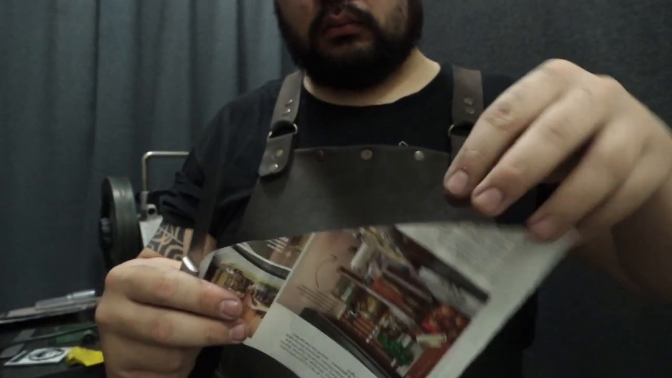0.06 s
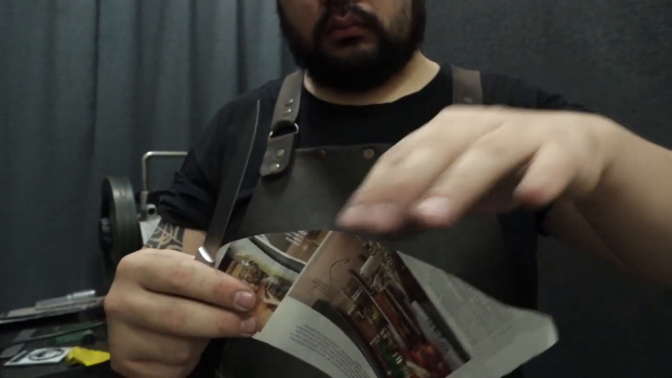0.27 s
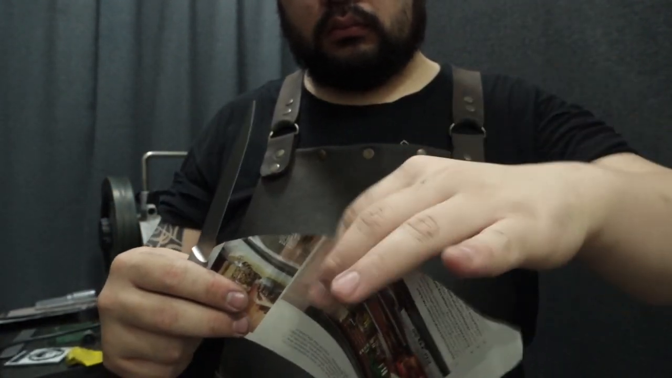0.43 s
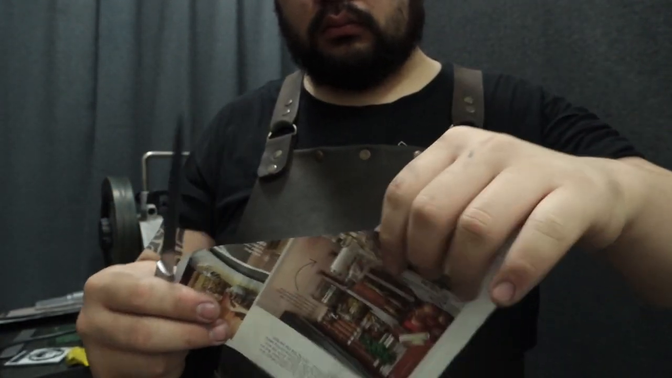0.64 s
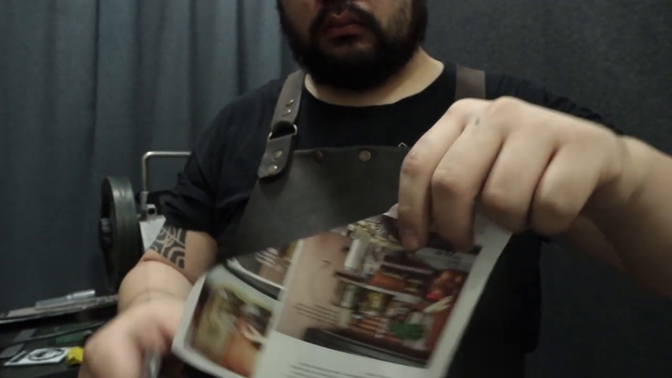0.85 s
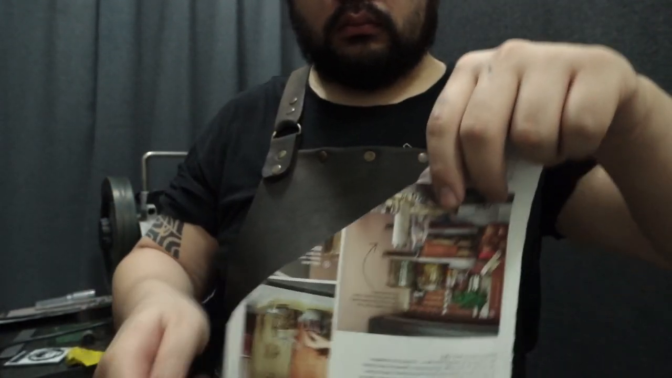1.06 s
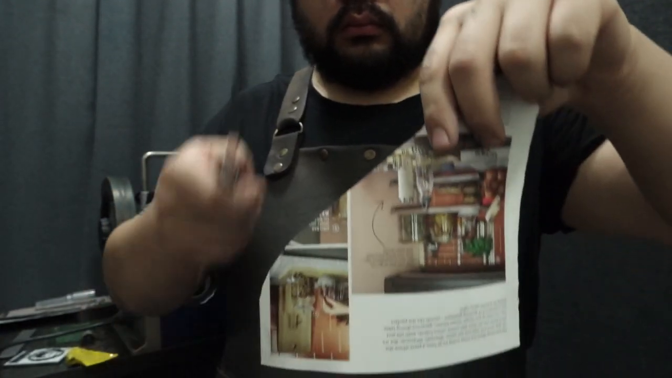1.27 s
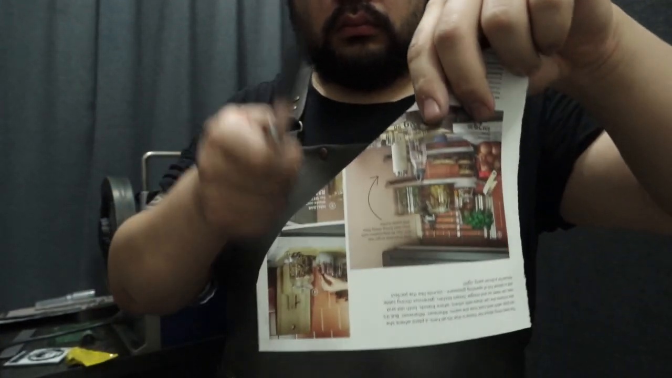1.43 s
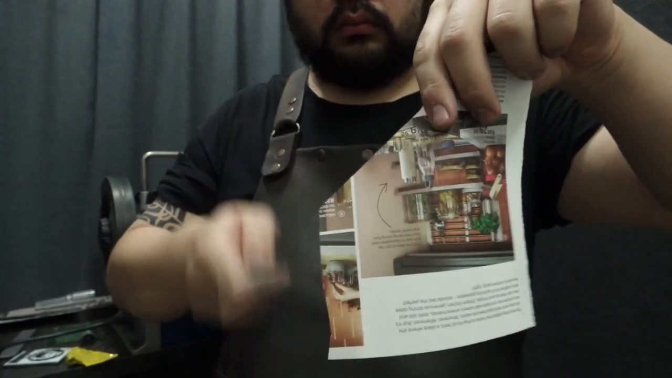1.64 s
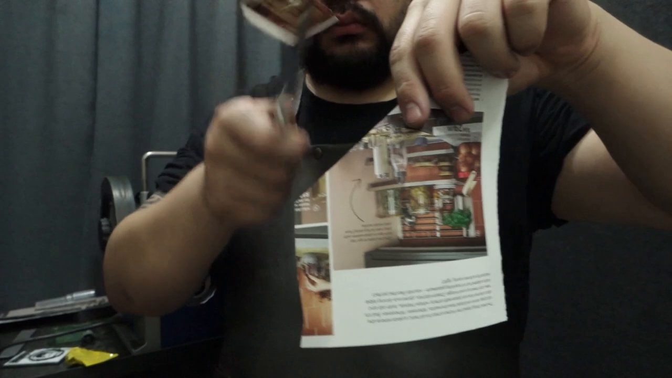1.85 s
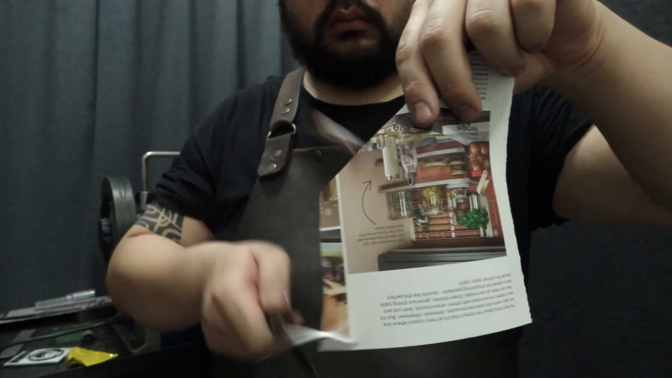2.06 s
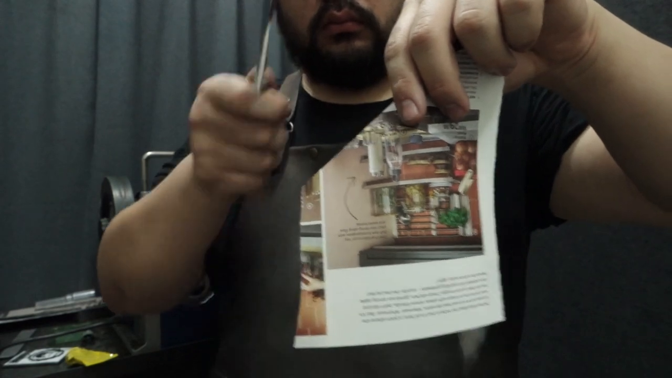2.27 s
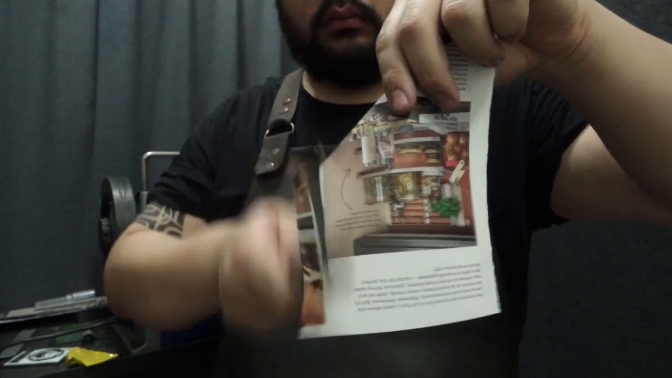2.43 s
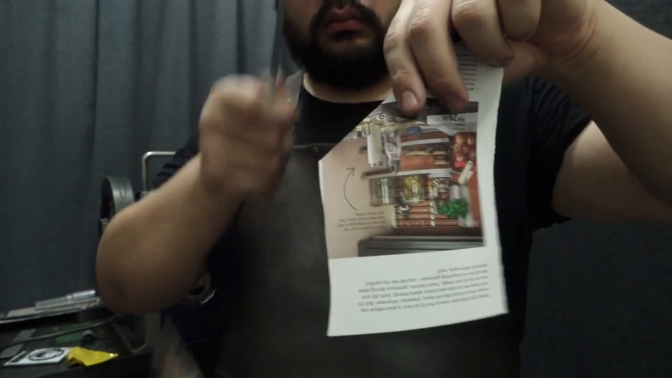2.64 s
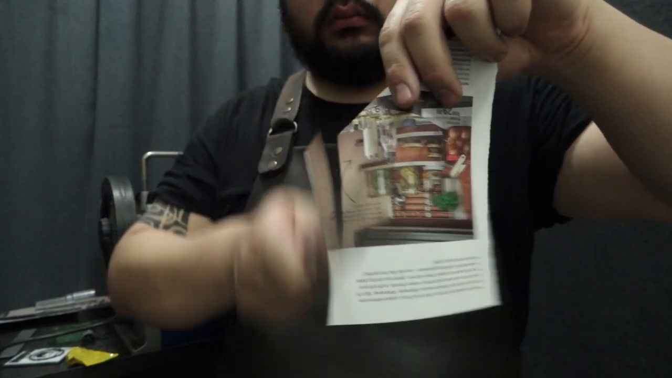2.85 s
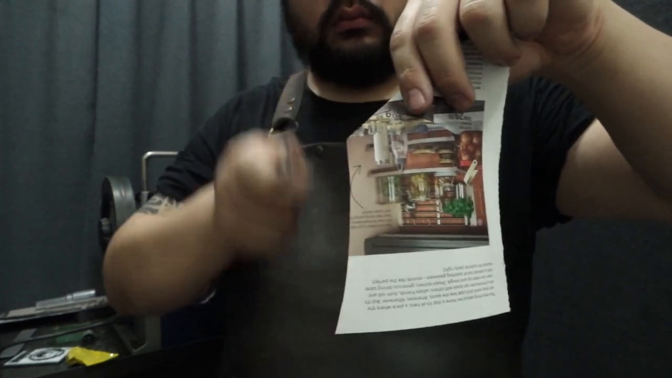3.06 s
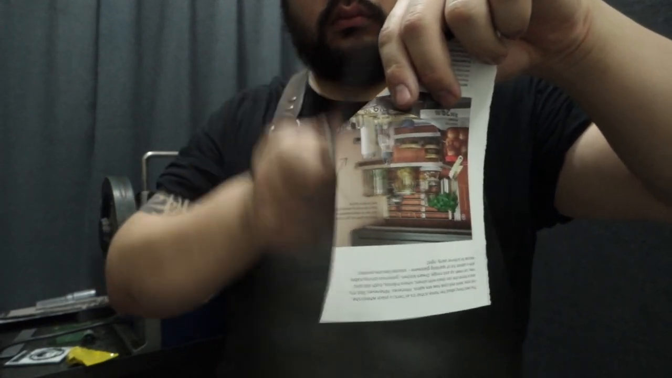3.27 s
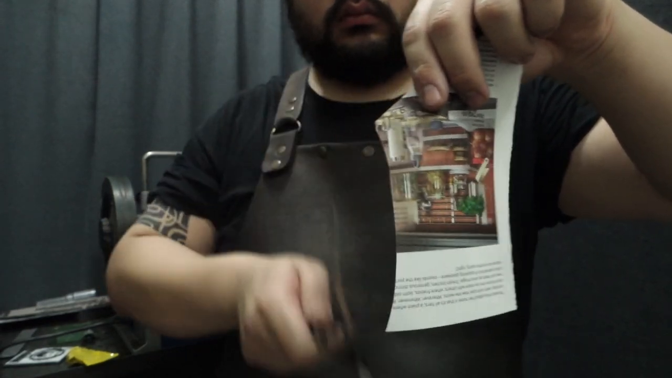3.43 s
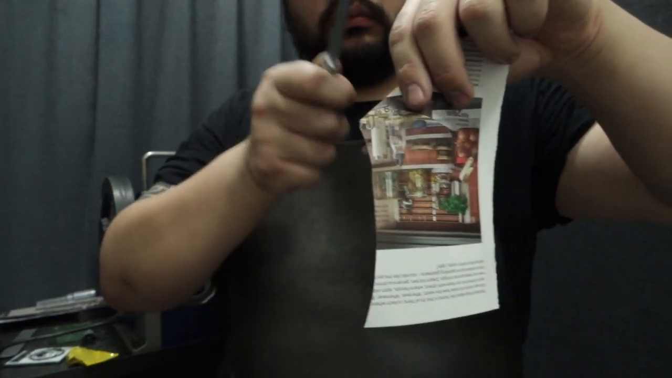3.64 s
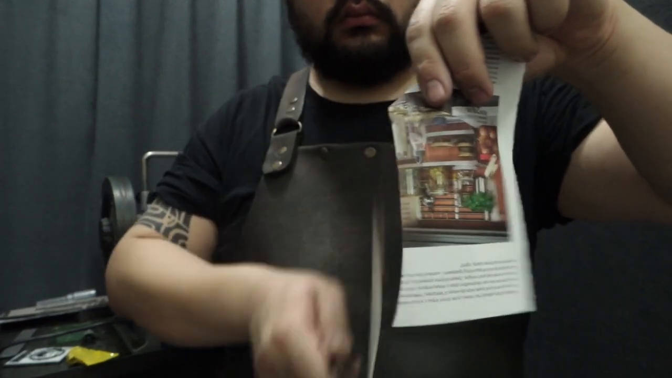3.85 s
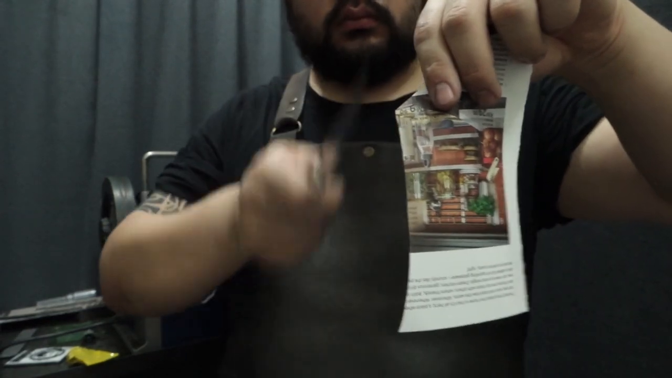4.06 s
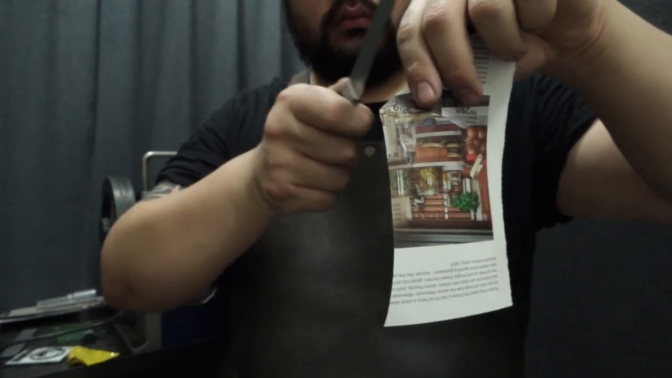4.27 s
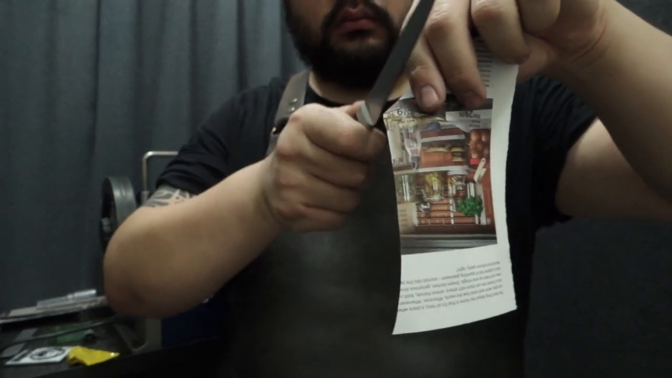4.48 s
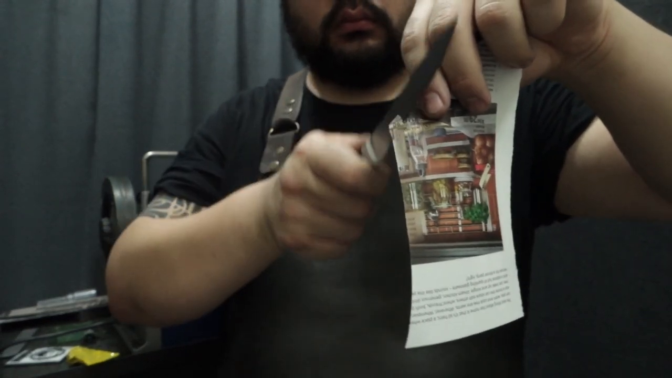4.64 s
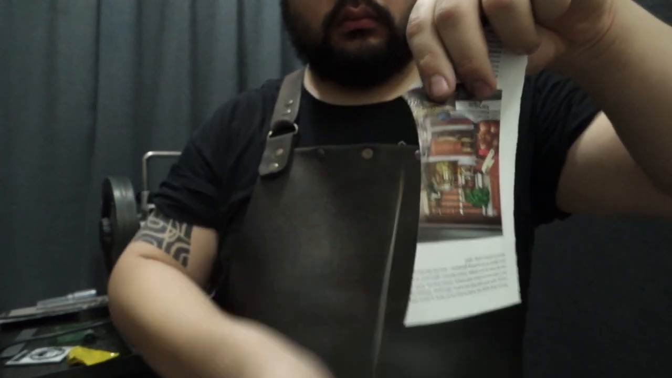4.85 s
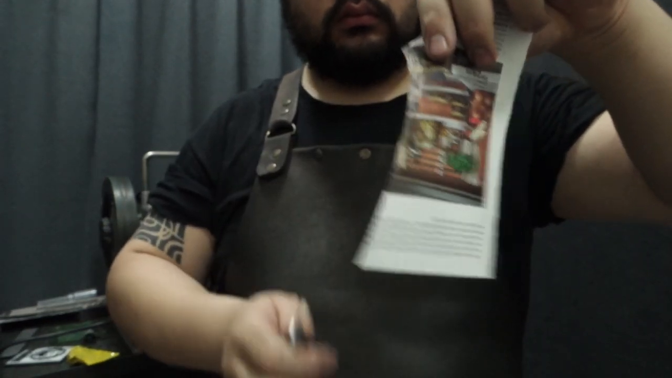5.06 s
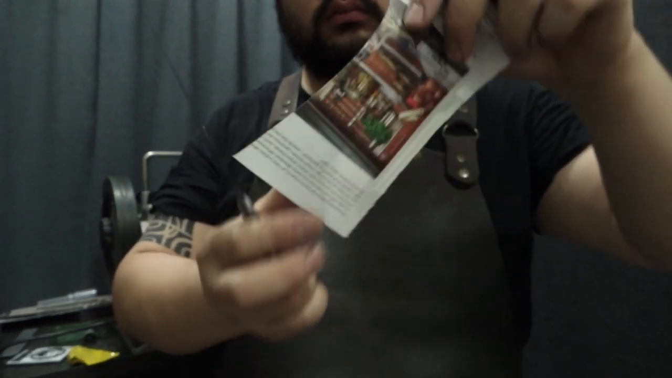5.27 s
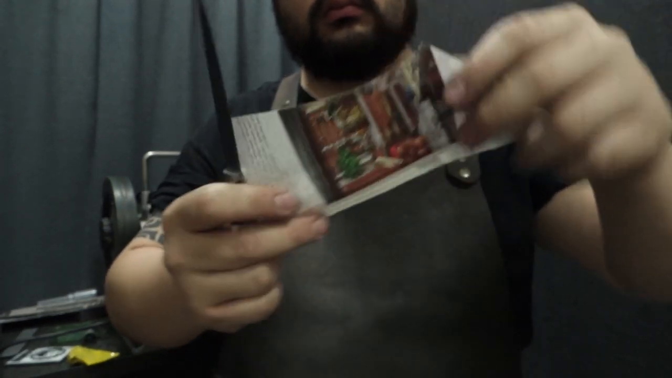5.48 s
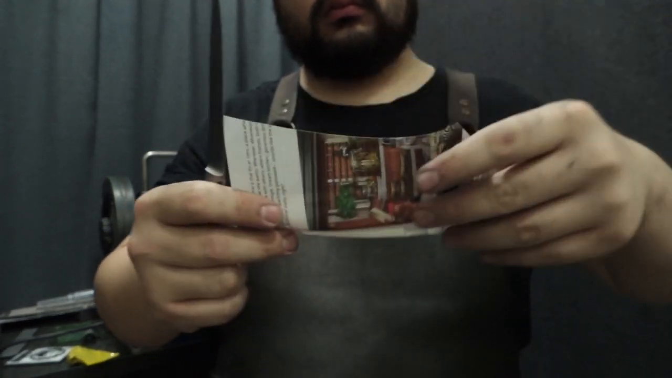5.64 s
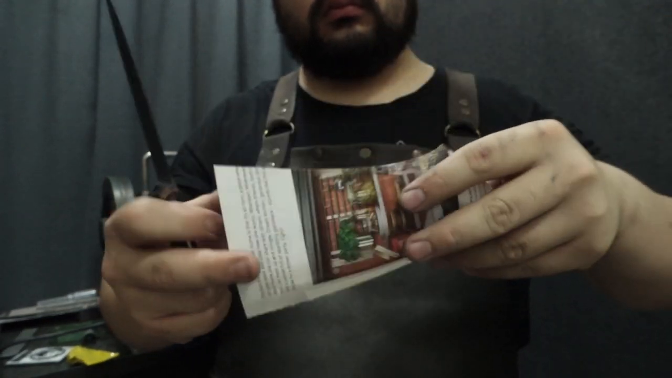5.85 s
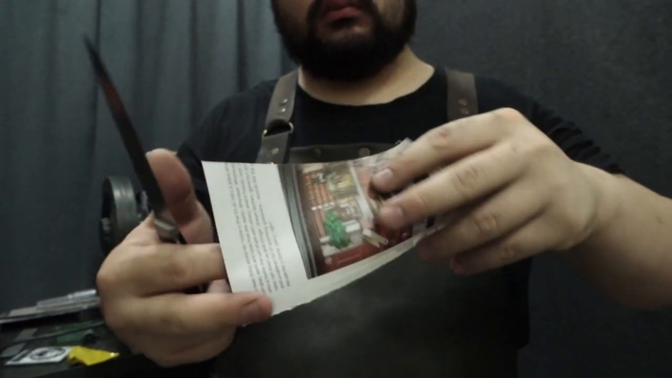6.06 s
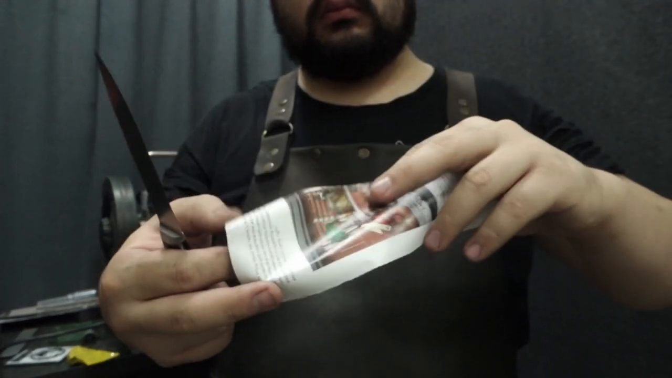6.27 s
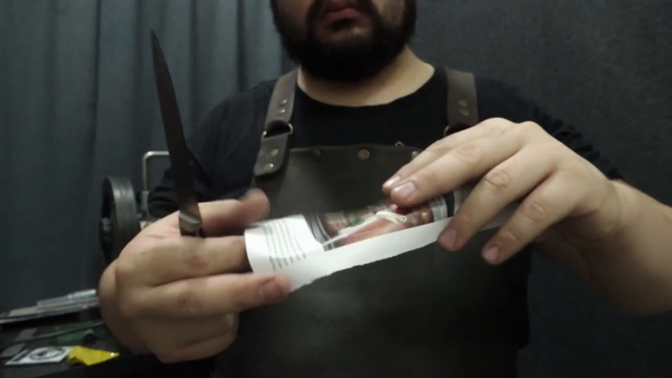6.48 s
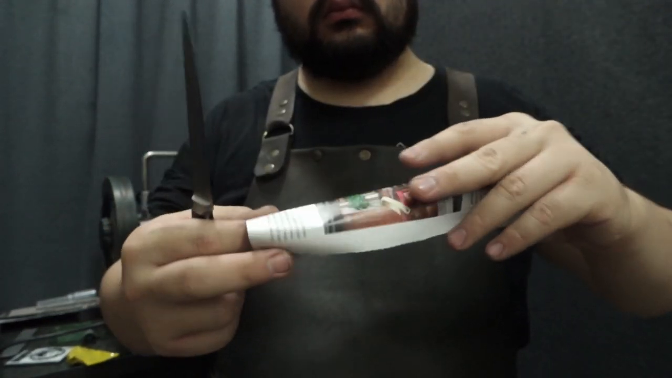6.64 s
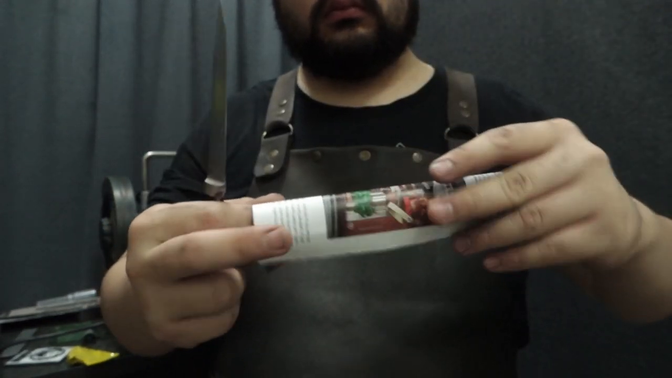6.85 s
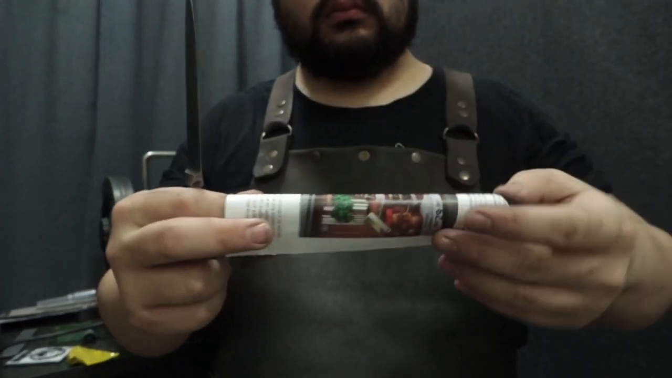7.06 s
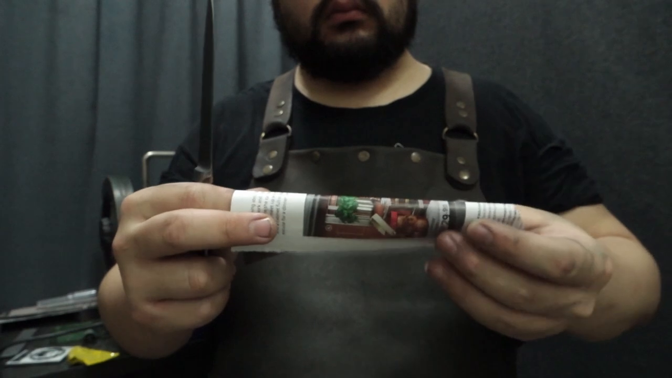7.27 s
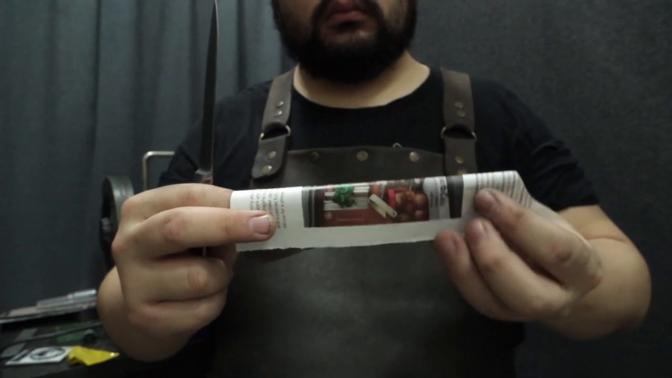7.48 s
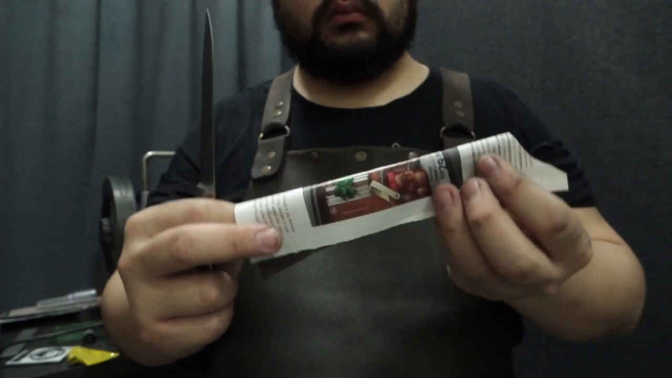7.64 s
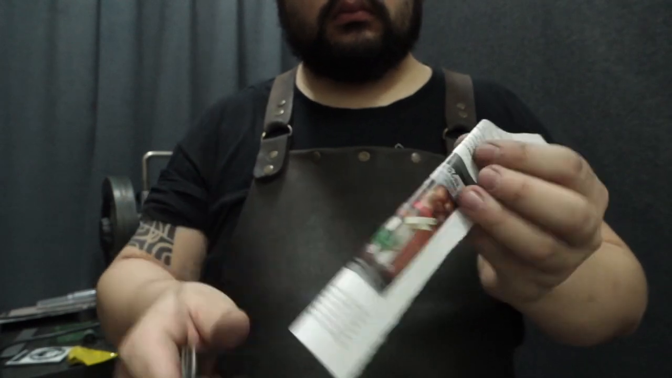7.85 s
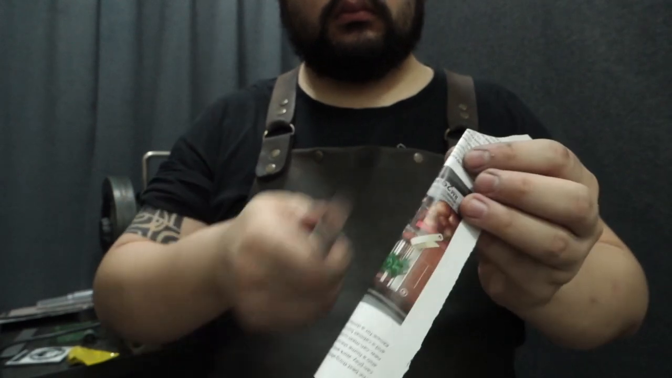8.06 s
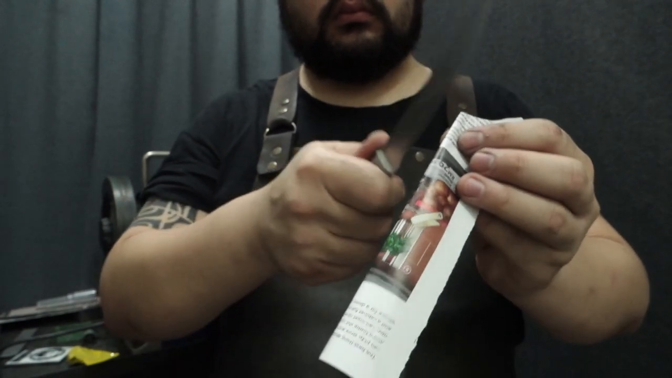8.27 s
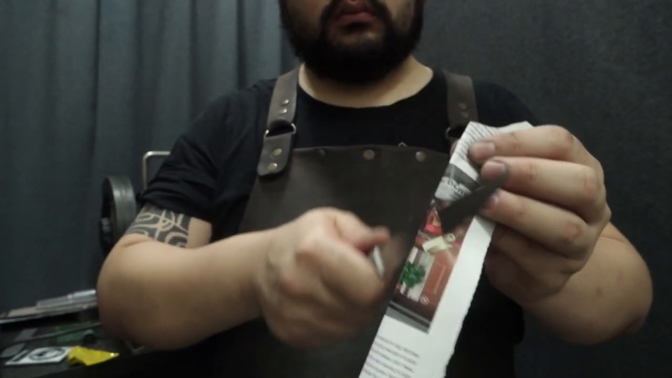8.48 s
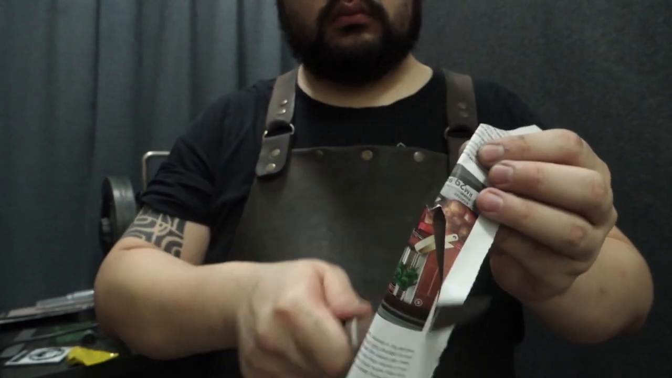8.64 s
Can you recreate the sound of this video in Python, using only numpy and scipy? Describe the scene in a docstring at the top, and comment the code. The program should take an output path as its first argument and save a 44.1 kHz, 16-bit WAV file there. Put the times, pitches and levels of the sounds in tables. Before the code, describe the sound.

A magazine page rustles in the hand, then a sharp knife takes off strips in six quick, evenly spaced swishes and one longer, rasping cut. The remaining paper rubs, crinkles and pops as it is folded and creased, and the folded strip is sliced slowly. The sounds are close, in a small workshop with a brief echo and a faint fan behind.

```python
"""A small workshop: a sharp knife slices strips off a hanging magazine page, six quick swishes and a
longer cut. The page is gripped, folded and creased, then the folded strip is sliced slowly. Fibres
snap under the edge, hissing at the cut and shaking the sheet; handled paper rubs, crinkles and pops.
The room answers briefly. Behind a close pair of microphones a fan whirs and a thin whine comes and goes."""
import sys
import numpy as np
from scipy import signal
from scipy.fft import rfft, irfft, next_fast_len
from scipy.io import wavfile

SR = 44100
rng = np.random.default_rng(int(sys.argv[2]) if len(sys.argv) > 2 else 0)


def unload_wav(signal):
    """Save mono or channel-first audio to the path in sys.argv[1] as 16-bit WAV at rate SR, clipped to [-1, 1]."""
    wavfile.write(
        sys.argv[1],
        SR,
        np.round(np.clip(np.atleast_2d(signal).T, -1, 1) * 32767).astype(np.int16),
    )


N = 384111


def amp(db):
    """Decibels to gain."""
    return 10 ** (np.asarray(db) / 20)


def evened(x):
    """Scales to rms 1."""
    return x / np.sqrt(np.mean(x ** 2) + 1e-20)


def read(points, hz):
    """Reads a curve on a log-frequency axis."""
    f, value = np.transpose(points)
    return np.interp(np.log(hz + 1), np.log(f + 1), value)


def add(mix, start_s, sound):
    """Mixes a sound in at its cue."""
    part = mix[..., max(round(start_s * SR), 0):][..., :sound.shape[-1]]
    part += sound[..., :part.shape[-1]]


def colour(x, eq, size=2048):
    """Minimum-phase EQ whose impulse response has energy 1."""
    log_gain = np.log(amp(read(eq, abs(np.fft.fftfreq(size, 1 / SR)))))
    response = np.fft.ifft(np.exp(np.conj(signal.hilbert(log_gain)))).real[:size // 2]
    return signal.fftconvolve(x, response / np.linalg.norm(response))[:len(x)]


def resonate(x, hz, width_hz):
    """A resonance that follows the curve hz; white noise keeps its power."""
    turn = np.exp(2j * np.pi * np.cumsum(hz * np.ones(len(x))) / SR)
    r = np.exp(-np.pi * width_hz / SR)
    return np.sqrt(2 * (1 - r * r)) * (turn * signal.lfilter([1], [1, -r], x / turn)).real


def drift(n, per_s):
    """A smooth random wobble with a spread of about 1."""
    knots = rng.standard_normal(int(n / SR * per_s) + 3)
    return np.interp(np.arange(n) / SR * per_s, np.arange(len(knots)), knots)


def panned(x, db):
    """Places a sound in stereo; positive is left."""
    return np.array([x * amp(db / 2), x * amp(-db / 2)])


def stroke(length_s, rise_s, fall_s):
    """Time, share done and gate of one hand movement, with a short tail."""
    t = np.arange(0, length_s + 0.0067, 1 / SR)
    gate = np.clip(t / rise_s, 0, 1) * np.clip((length_s - t) / fall_s + 1, 0, 1)
    return t, np.minimum(t / length_s, 1), gate


def arch(done, peak_share, swell_db, fade_db):
    """Level ride in dB along a stroke: up to 0 at its peak, then down."""
    return np.interp(done, [0, np.clip(peak_share, .05, .95), 1], [-swell_db, 0, -fade_db])


def fibres(n, per_s, spread_db, clump_db, clumps_per_s):
    """Tiny snaps of uneven size that come in clumps."""
    sizes = amp(spread_db * np.minimum(rng.exponential(1, n), 4)) * rng.choice([-1, 1], n)
    breaks = rng.random(n) < per_s / SR
    return evened(sizes * breaks * amp(clump_db * drift(n, clumps_per_s)))


# Bed of fan air and microphone hiss: freq_hz, gain_db
FAN_EQ = [(20, -42), (70, -38), (130, -24), (250, -20), (400, -11), (540, -3), (800, -6), (1100, -6.5),
          (1500, -8.5), (2450, -9.5), (3050, -20.5), (5000, -25), (8000, -25.5), (11000, -25.5)]
# Hum of the fan housing: pitch_hz, width_hz, gain_db
HOUSING_MODES = [(658.8, 70, 0.5), (1769, 46, -7.5), (2182, 59, -7)]


def fan(air_db=-59.5, housing_db=-64, side_db=-9):
    """Steady air noise with three housing resonances, almost alike in both channels."""
    mid, side = [colour(rng.standard_normal(N), FAN_EQ) for _ in range(2)]
    housing = np.zeros(N)
    for hz, width_hz, gain_db in HOUSING_MODES:
        band = resonate(rng.standard_normal(N), hz, 1.07 * width_hz)
        housing += amp(gain_db) * evened(resonate(band, hz, 1.07 * width_hz))
    whir = amp(air_db) * mid + amp(housing_db) * housing
    spread = amp(air_db + side_db) * np.array([side, -side])
    return (whir + spread) * amp(.5 * drift(N, 5.2))


# A thin whine comes and goes: start_s, end_s, first_hz, last_hz
WHINE_CUES = [(0, 0.293, 10300, 10300), (2.665, 2.865, 10400, 10400), (3.07, 3.183, 10600, 9900),
              (5.599, 5.746, 11100, 10200), (5.835, 5.995, 10800, 10600), (8.17, 8.35, 10200, 10800)]


def whine(start_s, end_s, first_hz, last_hz, level_db=-71, wander_hz=150, jitter_hz=90):
    """A faint high tone that wanders."""
    n = max(int((end_s - start_s) * SR), 500)
    hz = np.linspace(first_hz, last_hz, n) + wander_hz * drift(n, 30) + jitter_hz * drift(n, 400)
    tone = np.sin(2 * np.pi * np.cumsum(hz) / SR)
    return start_s, amp(level_db) * tone * signal.windows.tukey(n, .4)


# Decay of the workshop: freq_hz, t60_s
ROOM_DECAY = [(150, 0.46), (660, 0.3), (1800, 0.32), (4500, 0.3), (11000, 0.29)]
# Tone of its reverb: freq_hz, gain_db
ROOM_EQ = [(100, 1.5), (500, -0.5), (1500, -6), (2700, -4), (4500, 0.5), (7000, -7), (11000, -2)]


def room(x, predelay_s=0.0049, build_s=0.0084):
    """A dense tail that dies band by band; the channels are most alike in the bass."""
    size = SR // 2
    hz, t, noise = signal.stft(rng.standard_normal((2, size)), SR, nperseg=256)
    coherence = read([(200, 0.87), (2000, 0.22), (3200, 0.46), (4500, 0.033), (11000, .15)], hz)[:, None]
    noise[1] = coherence * noise[0] + np.sqrt(1 - coherence ** 2) * noise[1]
    t60 = read(ROOM_DECAY, hz)[:, None]
    decay = amp(read(ROOM_EQ, hz)[:, None] - 60 * t / t60)
    unit_energy = np.sqrt(2 * np.log(1000) / (t60 * SR))
    tail = signal.istft(noise * decay * unit_energy, SR, nperseg=256)[1][:, :size]
    tail *= np.clip((np.arange(size) / SR - predelay_s) / build_s, 0, 1)
    return signal.fftconvolve(x.mean(0)[None], tail, axes=1)[:, :N] * amp([[-1], [1]])


def near_echo(x, delay_s=0.001325, echo_db=-11):
    """A surface just behind the page sends the sheet's back wave forward, inverted."""
    at = np.arange(N)
    delayed = np.array([np.interp(at - delay_s * SR, at, channel, left=0) for channel in x])
    return x - amp(echo_db) * delayed


# Phase across the microphone pair: freq_hz, left_lead_rad
MIC_PHASE = [(20, 0), (2200, -.08), (3500, -.5), (4200, -1.8), (4600, -3.2), (5200, -5.5), (6200, -6.5),
             (8000, -7.0), (11000, -7.1)]
# Balance across the pair: freq_hz, left_minus_right_db
MIC_BALANCE = [(100, 1.5), (1000, -1.6), (2500, -1.1), (3600, -7.5), (4700, -6), (6200, -3.5), (8000, -8.5),
               (10000, -11), (11000, -11)]


def microphones(x):
    """Direct sound reaches the two microphones with a phase and level gap that grows in the treble."""
    size = next_fast_len(N + 4096)
    hz = np.fft.rfftfreq(size, 1 / SR)
    gains = panned(np.ones(len(hz), complex), read(MIC_BALANCE, hz))
    gains[0] *= np.exp(1j * read(MIC_PHASE, hz))
    return irfft(rfft(x, size) * gains, size)[:, :N]


# Voice of a panel of the page in the hands: freq_hz, gain_db
PANEL_EQ = [(150, -45.5), (400, -13.5), (800, -7.5), (1200, 0.5), (1900, 5), (2400, 4.5), (3100, -1.5),
            (3650, -8.5), (4600, -12.5), (7000, -21.5), (11000, -49.5)]


def panel(x, pitch_hz, unshifted_hz=2150):
    """The page's tone, shifted to the panel that moves: smaller, stiffer panels lie higher."""
    return colour(x, [(hz * pitch_hz / unshifted_hz, db) for hz, db in PANEL_EQ])


# Top end of handled paper: freq_hz, gain_db
PAPER_TREBLE_EQ = [(2000, -37), (4200, -12.5), (5500, -4.5), (7000, 3.5), (8500, -1), (10000, -0.5),
                   (11500, -1.5)]
# The page slides under the fingers, a loose strip falls, or a sleeve brushes softly:
# start_s, length_s, level_db, bright_db, pitch_hz
RUSTLE_CUES = [(0.445, 0.095, -53, -7, 2200), (0.536, 0.24, -45, -6.5, 1800),
               (0.739, 0.25, -51.5, -4, 1830), (1.675, 0.082, -37.5, -4.5, 2360),
               (2.539, 0.086, -52, 10.5, 2430), (3.47, 0.073, -50.5, 6, 2350),
               (4.465, 0.073, -56, 1.5, 2420), (4.569, 0.16, -44.5, -1, 1730),
               (5.209, 0.12, -60.5, 3, 2000), (5.323, 0.053, -47.5, 7.5, 2380),
               (5.394, 0.091, -51.5, 3, 2020), (5.518, 0.19, -52.5, 0, 1980),
               (5.714, 0.14, -50.5, -3, 1550), (6.089, 0.18, -45.5, -3.5, 2000),
               (6.265, 0.14, -47.5, -2, 1970), (6.416, 0.082, -48, -3.5, 1960),
               (6.481, 0.13, -48.5, -0.5, 2190), (6.626, 0.08, -48.5, 1.5, 2300),
               (6.674, 0.09, -25, -7.5, 2730), (6.854, 0.086, -44, -6, 2360),
               (6.932, 0.21, -46, -7.5, 2160), (7.275, 0.2, -50, -12, 2040), (7.443, 0.12, -51, -5.5, 2640),
               (7.619, 0.14, -52.5, -6.5, 2320), (7.727, 0.13, -45, -3.5, 2550),
               (7.888, 0.15, -60, -9, 442)]


def rustle(start_s, length_s, level_db, bright_db, pitch_hz, crinkle_hz=2750, width_hz=520):
    """Skin, paper or cloth rubs: a fine grain, and crinkles that do not grow with a hard stroke."""
    t, done, gate = stroke(length_s, rise_s=0.0078, fall_s=.007)
    n = len(t)
    ride_db = level_db + arch(done, peak_share=0.22, swell_db=5, fade_db=13.5)
    grains = gate * amp(ride_db) * fibres(n, per_s=12000, spread_db=0.5, clump_db=4, clumps_per_s=180)
    crinkle_db = np.minimum(ride_db, -44) - 7.5
    crinkles = gate * amp(crinkle_db) * fibres(n, per_s=170, spread_db=5.5, clump_db=-3, clumps_per_s=51)
    # each crinkle flips a small stiff facet, which rings for a moment
    facet_hz = crinkle_hz * (1 + 0.15 * drift(n, 60))
    facets = resonate(resonate(crinkles, facet_hz, width_hz), facet_hz, width_hz) / 3
    hiss = amp(bright_db - 1) * colour(grains + .5 * crinkles, PAPER_TREBLE_EQ)
    return start_s, amp(-3.5) * panel(grains, pitch_hz) + facets + hiss


# Puff of air from a snapping panel: freq_hz, gain_db
FLAP_EQ = [(25, -24), (100, -23), (200, -10.5), (350, -1), (550, 5.5), (850, 9), (1300, 6.5), (2500, -17),
           (5000, -39)]
# The page buckles or a crease gives: start_s, energy_db, treble_db, crackle_db, pitch_hz
SNAP_CUES = [(0.532, -16.5, -32, 0, 2180), (0.57, -15, -29, 0.5, 1870), (0.5875, -17, -19, -14, 1700),
             (0.6621, -21, -10, -3, 2300), (0.83, -21, -23, 2.5, 1700), (0.891, -20.5, -17, -1, 2160),
             (1.6491, -17, -4, 4, 2350), (1.6854, -17.5, -12, 4, 2420), (2.1076, -19.5, -23, -8, 1870),
             (2.9976, 1, -5, 0.5, 2260), (5.3756, -17, -12, 7, 1650), (5.4521, -12, 3, -15, 2380),
             (5.456, -10.5, 1, -4.5, 2380), (5.7522, -18.5, -32, 5.5, 1470), (5.9789, -11.5, -3, -4, 2070),
             (5.9874, 0, -8, 2.5, 2000), (6.1377, -5, -19, -3.5, 1960), (6.2743, -23, -24, -1, 1960),
             (6.3314, -6.5, -9, -4.5, 2170), (6.4199, -19.5, -12, 4, 2140), (6.6597, 1.5, -1.5, -6, 2470),
             (6.6813, -4.5, 3, -10, 2730), (6.926, -17.5, -16, 4, 2110), (6.951, -18.5, -22, -6, 2220),
             (6.9664, -19, -26, -10, 2400), (7.3637, -27, -24, -14, 2250), (7.661, -25, -18, 6, 2250),
             (7.7004, -10, -35, -11, 2140), (7.8043, -17, -14, 2.5, 2410), (8.3564, -15.5, -6.5, 4, 2200),
             (8.4127, 2, -17, -22, 2340)]


def snap(start_s, energy_db, treble_db, crackle_db, pitch_hz, splinter_s=.0015, settle_s=0.0062):
    """The paper gives way in one jerk and a few splinters; a short crackle settles it."""
    n, scatter = 4000, 1.8
    t = np.arange(n) / SR
    splinters = np.exp(-t / splinter_s) * rng.standard_normal(n)
    crackle = fibres(n, per_s=7000, spread_db=5, clump_db=1, clumps_per_s=1180)
    crackle *= np.exp(-t / settle_s) * np.clip(t / 0.01, 0, 1)
    pop = (signal.unit_impulse(n) + scatter * splinters / np.linalg.norm(splinters)) / np.hypot(1, scatter)
    push = amp(energy_db) * (pop + amp(crackle_db - 2.5) * crackle / np.linalg.norm(crackle))
    treble = amp(treble_db + 1.56) * colour(push, PAPER_TREBLE_EQ)
    # the air a snap pushes grows more slowly than its energy
    flap = amp(-16 + 0.38 * energy_db) * colour(pop, FLAP_EQ)
    return start_s, amp(-0.5) * panel(push, pitch_hz) + treble + flap


# Hiss at the knife's edge: freq_hz, gain_db
EDGE_HISS_EQ = [(2500, -50.5), (4500, -6), (5500, -0.5), (6400, 5), (7500, 3), (8500, 2), (10000, -24.5),
                (11500, -9.5)]
# Fine fizz on top of it: freq_hz, gain_db
EDGE_FIZZ_EQ = [(4000, -44), (6500, -4), (8200, -4), (9700, 4.5), (11000, 2), (12000, -5.5)]


def cut(done, gate, sheet_db, edge_db, body_db, fizz_db, rasp_hz, pan_db, sheet_eq, body_eq, ring_db):
    """The edge severs fibres; each snap hisses at the cut and shakes the paper until the blade leaves."""
    n = len(done)
    snaps = gate * fibres(n, per_s=14000, spread_db=3, clump_db=0.5, clumps_per_s=340)
    bending = colour(snaps * amp(sheet_db), sheet_eq)
    # the rasp climbs as the uncut paper shortens, and wavers as the paper flexes
    ring_hz = rasp_hz * (1 + 0.12 * (done - .5)) * (1 + 0.11 * drift(n, 110))
    ring = resonate(bending, ring_hz, width_hz=280) / 3
    sheet = amp(-0.5) * bending + amp(ring_db) * np.roll(ring, SR // 1000)  # rings a millisecond late
    body = colour(snaps * amp(body_db + 2 * drift(n, 90)), body_eq)
    # fizz_db tilts the edge from hiss towards fizz
    hiss = colour(snaps * amp(edge_db - 2 - fizz_db / 2 + 2 * drift(n, 126)), EDGE_HISS_EQ)
    fine_snaps = gate * fibres(n, per_s=20000, spread_db=3.5, clump_db=2, clumps_per_s=260)
    fizz = colour(fine_snaps * amp(edge_db - 2 + fizz_db / 2), EDGE_FIZZ_EQ)
    return panned(hiss + fizz, pan_db + 6) + sheet + body


# The open sheet under the blade, its bending waves and its low body: freq_hz, gain_db
SHEET_EQ = [(500, -79.5), (1200, -12), (1600, -9), (1850, 3.5), (2100, -1.5), (2400, 5.5), (2700, 1),
            (3100, -2), (3450, -2), (4000, -9.5), (4800, -12.5), (6000, -9), (9000, -45)]
SHEET_BODY_EQ = [(25, -43.5), (120, -55), (220, -34), (320, -24.5), (420, -11.5), (650, -6), (850, -3.5),
                 (1000, -1), (1200, 0.5), (1380, 8), (1600, -2.5), (2200, -1.5), (4000, -55)]
# The stiffer folded strip, a narrower, higher rasp over a flatter body: freq_hz, gain_db
STRIP_EQ = [(500, -55), (1200, -29), (1750, -1), (2000, -8), (2250, 3.5), (2500, 3.5), (2950, -2),
            (3300, -3), (3800, -13), (4800, -14.5), (6000, -21), (9000, -46)]
STRIP_BODY_EQ = [(25, -47), (120, -40), (220, -21.5), (320, -11), (500, -4), (850, 2), (1180, 6.5),
                 (1450, -2), (2200, -13), (4000, -46)]
# Level rides down the open page and down the folded strip: time_s, sheet_db, edge_db, body_db
PAGE_RIDE = [(4.612, -40, -36.5, -45), (4.616, -42.5, -34, -38), (4.67, -34, -39, -40),
             (4.7, -29, -29.5, -36.5), (4.74, -23.5, -28.5, -38), (4.766, -28.5, -26, -30),
             (4.784, -23.5, -31, -32), (4.808, -22.5, -22.5, -36.5), (4.826, -32.5, -27, -45.5)]
STRIP_RIDE = [(8.362, -36.5, -46, -53), (8.38, -30.5, -41, -45), (8.494, -25, -33, -40),
              (8.506, -23, -34.5, -39), (8.53, -26, -36.5, -38), (8.584, -26, -37.5, -40),
              (8.614, -25, -32.5, -32), (8.644, -24, -28.5, -37), (8.705, -25, -28, -42)]


def slow_cut(ride, sheet_eq, body_eq, rasp_hz, pan_db, ring_db, fizz_db, body_trim_db):
    """The blade is drawn slowly; the rasp swells unevenly and grows finer towards the end."""
    times, *levels = np.transpose(ride)
    t, done, gate = stroke(times[-1] - times[0], rise_s=0.002, fall_s=.003)
    sheet_db, edge_db, body_db = (np.interp(times[0] + t, times, level) for level in levels)
    fizz_db += 4 * (done - .5)
    return times[0], cut(done, gate, sheet_db, edge_db, body_db + body_trim_db, fizz_db,
                         rasp_hz, pan_db, sheet_eq, body_eq, ring_db)


# Quick strokes that each take off a strip:
# start_s, length_s, sheet_db, peak_share, edge_db, fizz_db, body_db, rasp_hz, pan_db, bite_db
SWISH_CUES = [(1.4934, 0.063, -24, 0.75, -30.5, 0, -39.5, 2480, -1, -15),
              (1.9445, 0.079, -29.5, 0.42, -30, -2, -48, 2130, -8, -8),
              (2.405, 0.075, -27.5, 0.61, -30.5, -2, -43.5, 2270, -3, -6),
              (2.8447, 0.084, -28, 0.77, -28.5, 3.5, -45.5, 2350, -4, -7.5),
              (3.2885, 0.084, -26, 0.75, -29, 4, -40.5, 2330, -6, -4),
              (3.7629, 0.097, -29, 0.61, -28.5, -0.5, -40.5, 2330, -4.5, -10.5)]


def swish(start_s, length_s, sheet_db, peak_share, edge_db, fizz_db, body_db, rasp_hz, pan_db):
    """One quick stroke: the edge hisses from the start and dulls, while the sheet's rasp swells."""
    _, done, gate = stroke(length_s, rise_s=0.0014, fall_s=0.0028)
    # the sheet shakes harder as the blade sinks in, and eases as the strip comes free
    sheet_db += arch(done, peak_share, swell_db=8, fade_db=2.5)
    edge_db += done - .5
    fizz_db -= 5 * (done - .5)
    return start_s, cut(done, gate, sheet_db, edge_db, body_db, fizz_db,
                        0.96 * rasp_hz, pan_db, SHEET_EQ, SHEET_BODY_EQ, ring_db=-9)


def scene():
    """Cuts, handling and snaps in the room, over the fan and the whine."""
    background = fan()
    slicing, rubbing, snapping = np.zeros((3, 2, N))
    for start_s, *shape, bite_db in SWISH_CUES:
        add(slicing, *swish(start_s, *shape))
        # the blade's first bite into the page's edge
        add(snapping, *snap(start_s, bite_db, treble_db=-3.5, crackle_db=-7, pitch_hz=1980))
    add(slicing, *slow_cut(PAGE_RIDE, SHEET_EQ, SHEET_BODY_EQ, rasp_hz=2080,
                           pan_db=-6.5, ring_db=-12.5, fizz_db=-1, body_trim_db=2))
    add(slicing, *slow_cut(STRIP_RIDE, STRIP_EQ, STRIP_BODY_EQ, rasp_hz=2630,
                           pan_db=-7.5, ring_db=-9, fizz_db=0.4, body_trim_db=-0.5))
    for cue in RUSTLE_CUES:
        add(rubbing, *rustle(*cue))
    for cue in SNAP_CUES:
        add(snapping, *snap(*cue))
    for cue in WHINE_CUES:
        add(background, *whine(*cue))
    # the handled page is held nearer the middle and faces away, so more of it arrives by way of the room
    handling = (amp(-0.5) * rubbing + snapping) * amp([[1.2], [-1.2]])
    reverb_send = slicing + amp(1.5) * rubbing + amp(1.0) * snapping
    return microphones(near_echo(slicing) + handling) + room(reverb_send) + background


def record(dry):
    """A steep high cut on the whole mix."""
    cutoff_hz = 11130
    lowpass = signal.firwin(601, cutoff_hz, window=("kaiser", 8), fs=SR)
    return signal.oaconvolve(dry, lowpass[None], "same")


dry = scene()
out = record(dry)
unload_wav(out)
```